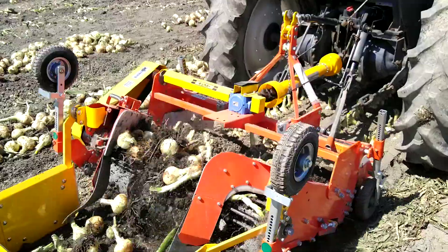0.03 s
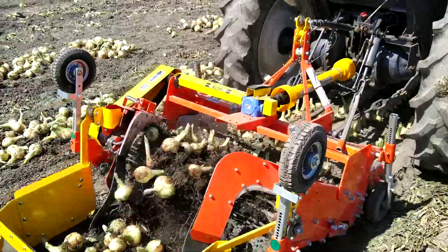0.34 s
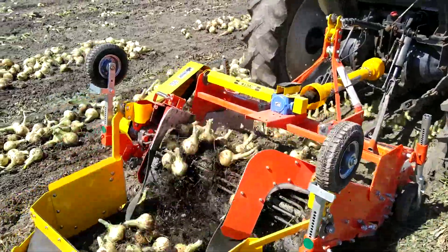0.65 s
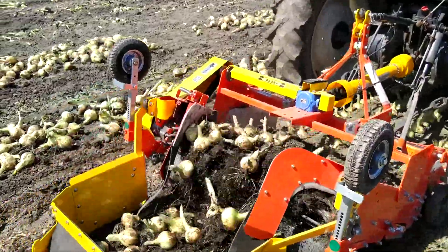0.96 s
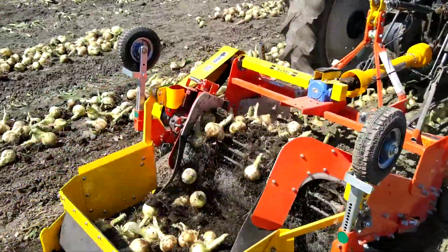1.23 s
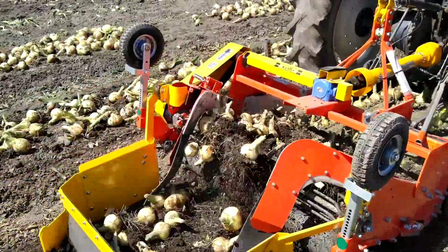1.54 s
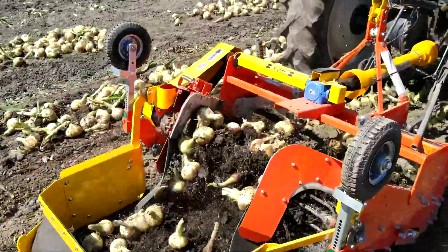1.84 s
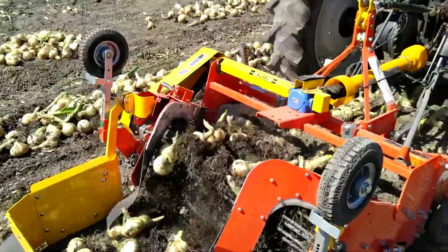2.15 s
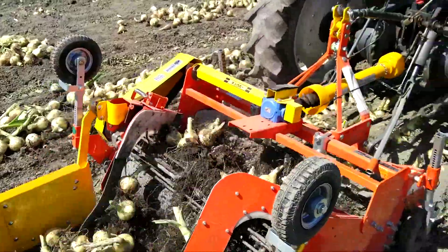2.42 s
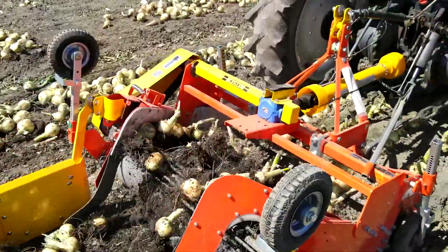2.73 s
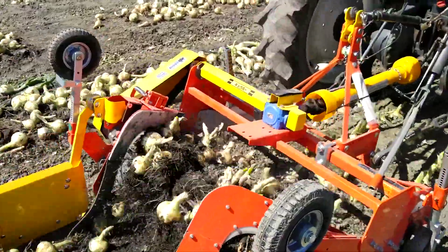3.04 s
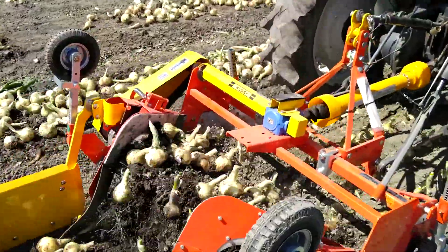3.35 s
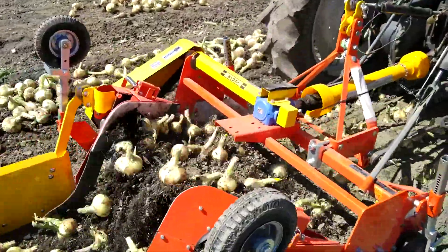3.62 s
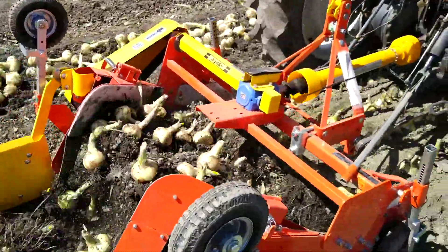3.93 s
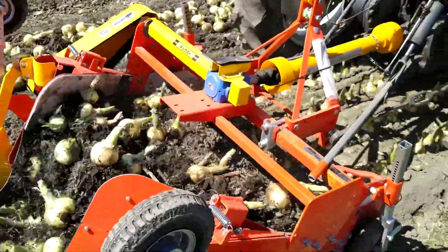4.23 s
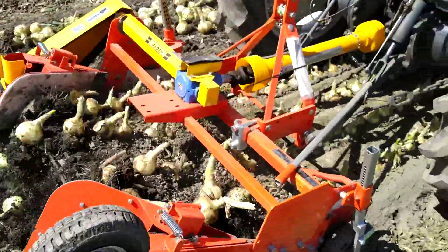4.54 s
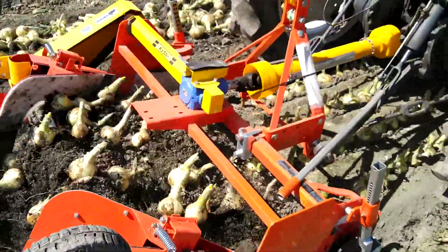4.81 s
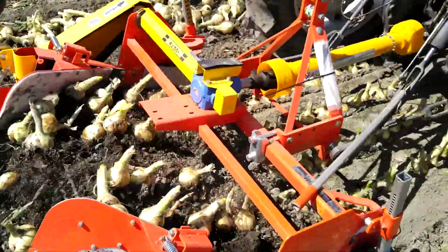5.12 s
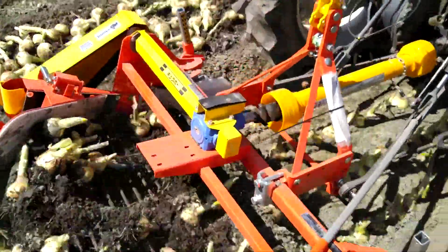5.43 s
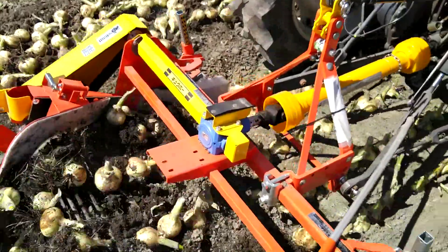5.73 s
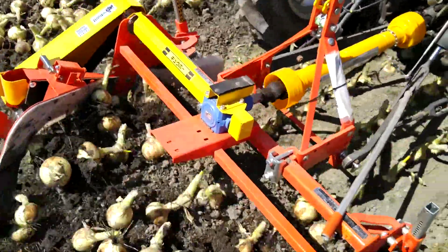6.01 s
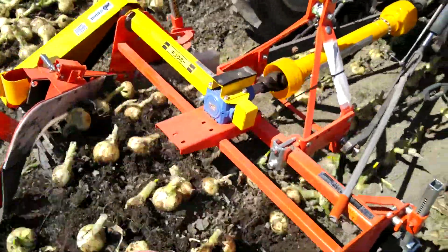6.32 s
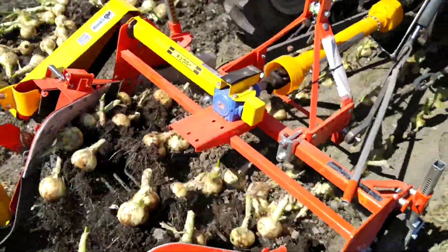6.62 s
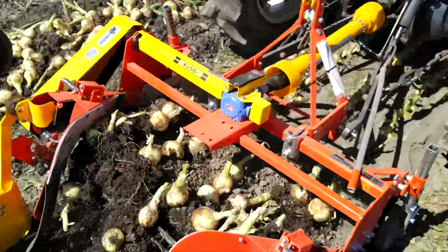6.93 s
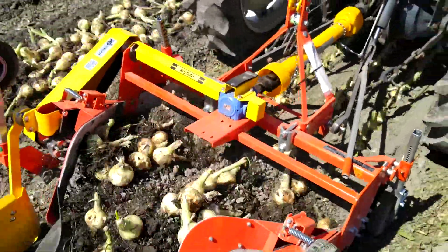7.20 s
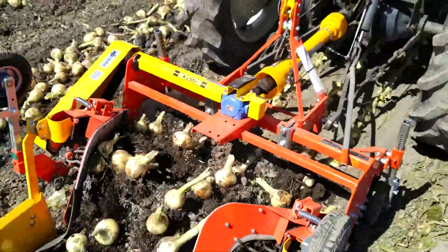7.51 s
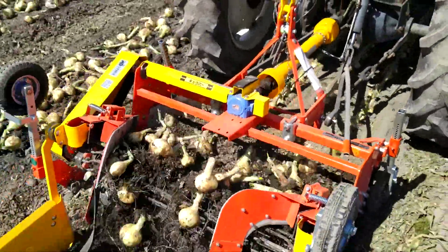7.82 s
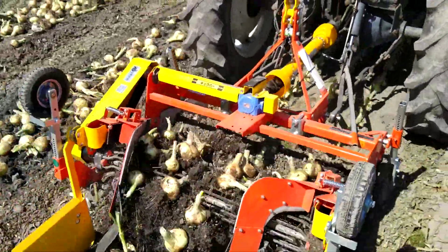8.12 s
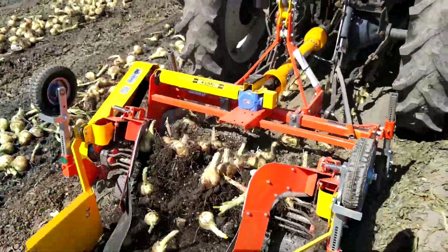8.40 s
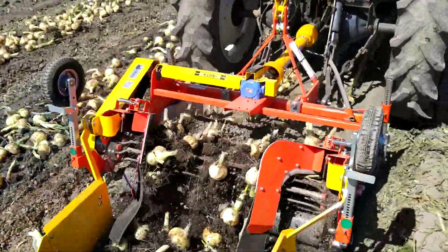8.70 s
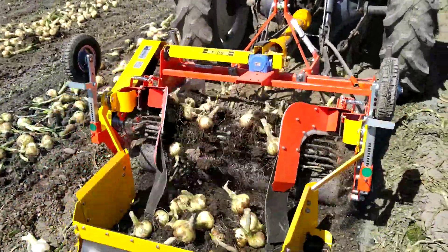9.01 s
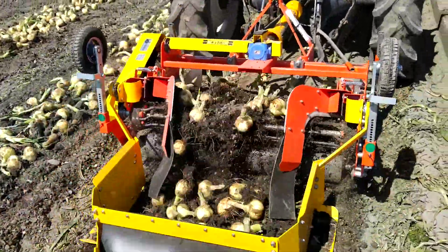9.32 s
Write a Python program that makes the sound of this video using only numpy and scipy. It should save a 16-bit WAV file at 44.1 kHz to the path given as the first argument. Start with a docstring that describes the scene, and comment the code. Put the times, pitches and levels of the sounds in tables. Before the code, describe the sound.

A tractor's diesel engine drones steadily in an open field, with a faint gear whine. Close to the microphone, the steel rod sieve of an onion digger rattles and rings without pause, while earth rumbles over it and sifts through with a crisp hiss. Clods knock irregularly, small stones clink and a dry bearing gives tiny high chirps. The machine grows slightly louder midway, then eases back. A few low wind gusts brush the microphone.

```python
"""Tractor pulling an onion digger

Beside the digger in a dry field, a three-cylinder diesel drones through its silencer and the drive
gears whine. The jolting rod sieve clatters and rings, and soil sifts through it with a crisp hiss.
Clods knock on the steel, stones clink on the rods, a dry bearing chirps. Wind brushes the microphone."""
import sys
import numpy as np
from scipy import signal
from scipy.fft import rfft, irfft
from scipy.io import wavfile
from scipy.ndimage import uniform_filter1d

SR = 44100
rng = np.random.default_rng(int(sys.argv[2]) if len(sys.argv) > 2 else 0)


def generate_wav(sig):
    """Save sig (samples, or channels by samples) to the path in sys.argv[1] as 16-bit PCM at SR."""
    pcm = np.round(np.clip(np.atleast_2d(sig).T, -1, 1) * 32767).astype(np.int16)
    wavfile.write(sys.argv[1], SR, pcm)


N = 417186

# bright spectrum of grit on steel: f/Hz, level/dB
GRIT_SPECTRUM = [(2000, -20), (3400, -7), (4200, -0.5), (5000, 1), (5700, -4), (6350, -9), (7200, -5),
                 (8300, -6), (10000, -1), (13000, -6.5)]


def from_db(db):
    """Decibels to gain."""
    return 10 ** (np.asarray(db) / 20)


def rms_one(x):
    """Scaled to rms 1."""
    return x / np.sqrt(np.mean(x ** 2) + 1e-20)


def in_time(rows):
    """Each column of an automation table at every sample."""
    s, *columns = np.transpose(rows)
    return [np.interp(np.arange(N) / SR, s, c) for c in columns]


def drift(rate):
    """Smooth random modulation of spread 1, moving about `rate` times a second."""
    r = np.exp(-80 * np.pi * rate / SR)
    slow = signal.lfilter([1], [1, -2 * r, r * r], rng.standard_normal(N // 40 + 2002))[2000:]
    return np.interp(np.arange(N) / 40, np.arange(len(slow)), rms_one(slow))


def colour(x, spectrum):
    """Equalises x with an (f/Hz, level/dB) curve, rolling off beyond its ends; rms 1."""
    hz, db = np.transpose(spectrum)
    bins = np.maximum(np.arange(N // 2 + 1) * SR / N, 1)
    gain = from_db(np.interp(np.log(bins), np.log(hz), db))
    skirts = np.minimum(1, np.minimum(bins / hz[0], hz[-1] / bins)) ** 4
    return rms_one(irfft(rfft(x) * gain * skirts, N))


def resonate(x, hz, width_hz):
    """One resonance; rms 1."""
    r = np.exp(-np.pi * width_hz / SR)
    return rms_one(signal.lfilter([1, 0, -1], [1, -2 * r * np.cos(2 * np.pi * hz / SR), r * r], x))


def contacts(per_s, spread_db, decay_s):
    """Power of random contacts of uneven size, each dying away; mean 1."""
    sizes = from_db(spread_db * np.minimum(rng.exponential(1, N), 4)) ** 2
    hits = sizes * (rng.random(N) < per_s / SR)
    power = signal.lfilter([1], [1, -np.exp(-1 / (decay_s * SR))], hits + 1e-18)
    return power / power.mean()


def grains(power):
    """Noise that follows a power envelope."""
    return np.sqrt(power) * rng.standard_normal(N)


def sheet(power, hz, width_hz):
    """Steel rings in a close cluster of modes: a noise band with steep sides."""
    return resonate(resonate(grains(power), hz, width_hz), hz, 3 * width_hz)


def blend(a, b, share):
    """A mix of a and b, with the given share of b."""
    return (1 - share) * a + share * b


def partial(turns, waver_db, waver_rate):
    """A sine whose rms wavers around 1."""
    return np.sqrt(2) * np.sin(2 * np.pi * turns) * from_db(waver_db * drift(waver_rate))


def swells(rows):
    """Smooth rises and falls, one per row, summed for each dB column."""
    t = np.arange(N) / SR
    return sum(np.outer(db, np.cos(np.pi * np.clip((t - s) / length_s, -.5, .5)) ** 2)
               for s, length_s, *db in rows)


def burst(time_s, level_db, decay_s, rise_s):
    """Envelope of blows that swell quickly and die away."""
    out, age = np.zeros(N), np.arange(SR // 8) / SR
    for s, db, decay in np.broadcast(time_s, level_db, decay_s):
        shape = (1 - np.exp(-age / rise_s)) * np.exp(-age / decay)
        start = int(s * SR)
        out[start:start + len(age)] += (from_db(db) * shape / shape.max())[:N - start]
    return out


def nearness(close_db, follows):
    """Gain of a machine part as the microphone comes closer, then falls behind."""
    approach = [(.4, -2.5), (1.7, -2.5), (2.5, -1.5), (4, -1.5), (5.5, 0.4), (6.7, -0.4), (7.9, -1.4),
                (8.6, -4), (9.45, -4.5)]  # closeness to the digger: t/s, gain/dB
    return from_db(close_db + follows * in_time(approach)[0])


def throb(rate_hz=7.87, depth=0.23, peak_s=.563, end_s=2.0):
    """Gain of the lowest exhaust partials: they pulse evenly at first, then settle."""
    t = np.arange(N) / SR
    return 1 + depth * np.clip((end_s - t) * 20, 0, 1) * np.cos(2 * np.pi * rate_hz * (t - peak_s))


def exhaust(cycles, dispersion=.264):
    """Three firings a cycle, each with a puff of gas; unequal cylinders add the partials between."""
    orders = [(1, -12), (2, -24), (3, 3), (4, -22.5), (5, -17.5), (6, -10.5), (7, -12.5), (9, -13.5),
              (11, -25), (12, -15.5), (15, -26.5), (22, -33), (25, -32.5), (26, -34), (34, -29),
              (43, -29.5), (46, -31.5), (47, -37), (54, -26)]  # exhaust partials: multiple of the four-stroke cycle, level/dB
    roar_spectrum = [(40, -14), (90, -5), (130, -2.5), (190, -2), (240, -7.5), (330, -13), (600, -48)]  # gas noise: f/Hz, level/dB
    drone = [(.4, -22, 0.3), (4, -20.5, -1), (6.6, -19, -1.5), (9.4, -21.3, -3.5)]  # exhaust as the microphone moves round: t/s, level/dB, upper-partial shade/dB
    loudness, shade = from_db(in_time(drone))
    # the silencer delays high partials more than low ones, smearing each pulse into a drone
    tones = [(k, from_db(db) * (shade if k > 3 else throb()), k * cycles - dispersion * k * k)
             for k, db in orders]
    firing = sum(gain * partial(turns, waver_db=0.62, waver_rate=2.6)
                 for k, gain, turns in tones if k <= 12)
    growl = sum(gain * partial(turns, waver_db=3.0, waver_rate=1.7)
                for k, gain, turns in tones if k > 12)
    puffs = blend(0.73, 1 + np.cos(6 * np.pi * cycles), share=0.74)
    roar = shade * colour(grains(puffs), roar_spectrum)
    return loudness * (firing + from_db(-3.5) * growl + from_db(-16.5) * roar)


def gears(cycles, teeth_per_cycle=17.03, shaft_hz=2.6, peak_s=0.536, swing_db=3):
    """Meshing teeth whine; each turn of the sieve shaft loads them and swells the sixth harmonic."""
    whine = [(7, -57), (8, -55.5)]  # upper harmonics: multiple of the tooth rate, level/dB
    beam = [(0, -58, -46), (4.8, -60, -55), (5.4, -45, -48), (5.8, -46.5, -50), (7.1, -43, -46.5),
            (8.4, -47.5, -49.5), (9.3, -53, -46.5)]  # harmonics beamed by the housing: t/s, third/dB, sixth/dB
    teeth = teeth_per_cycle * cycles + 0.012 * drift(14.3)  # a little backlash
    third_db, sixth_db = in_time(beam)
    load_db = swing_db * np.cos(2 * np.pi * shaft_hz * (np.arange(N) / SR - peak_s))
    harmonics = whine + [(3, third_db), (6, sixth_db + load_db)]
    return sum(from_db(db) * partial(k * teeth, waver_db=3.0, waver_rate=10.4) for k, db in harmonics)


def rumble(rods):
    """Earth tumbles over the sieve with a dull rumble."""
    tumbling = [(.4, -41), (2, -40.5), (5.4, -36.5), (6.9, -38.5), (9.4, -40.5)]  # tumbling earth: t/s, level/dB
    spectrum = [(200, 0), (330, -5), (430, 1.5), (560, -0.5), (700, -3), (850, -1), (1100, -14.5),
                (1600, -33)]  # its dull body: f/Hz, level/dB
    return from_db(in_time(tumbling)[0]) * colour(grains(blend(1, rods, share=0.4)), spectrum)


def sieve(rods):
    """The rods clatter and set the frame ringing."""
    spectrum = [(600, -14), (950, -1.5), (1300, 1.5), (1750, 0), (2100, -1), (2600, -5.5), (3300, -9.5),
                (4500, -21), (6000, -28)]  # rod clatter: f/Hz, level/dB
    frame_modes = [(504, 52, -13.5), (968, 63, -13.5), (1247, 44, -13.5), (1623, 70, -9.5), (1890, 63, -16)]  # frame resonances: f/Hz, width/Hz, level/dB
    clatter = colour(grains(blend(0.87, rods, share=0.73)), spectrum)
    frame = sum(from_db(db) * sheet(rods, hz, width) for hz, width, db in frame_modes)
    return nearness(-36, follows=0.64) * clatter + nearness(-34.5, follows=1) * frame


def side_plate(rods):
    """The steel side plate rings with the rods and with a sparser rattle of its own."""
    ringing = [(.4, -43.5), (2, -42), (2.2, -36.5), (3.25, -40), (3.45, -48), (3.9, -38), (5.3, -48.5),
               (7.9, -38.5), (9.4, -46.5)]  # plate ring: t/s, level/dB
    modes = [(1132, 38, -3), (1187, 32, -3.5)]  # plate resonances: f/Hz, width/Hz, level/dB
    rattle = blend(rods, contacts(per_s=60, spread_db=1.5, decay_s=0.0036), share=0.57)
    ring = sum(from_db(db) * sheet(rattle, hz, width) for hz, width, db in modes)
    return from_db(in_time(ringing)[0]) * ring


def chute(rods):
    """The shaken chute gives a hollow ring, lost as the microphone moves behind it."""
    ringing = [(.4, -45), (5.3, -41.5), (8.4, -65)]  # chute ring: t/s, level/dB
    return from_db(in_time(ringing)[0]) * sheet(np.sqrt(rods), hz=612, width_hz=55)


def gravel(pebbles):
    """Grit sizzles and small stones tick dryly on twelve rods, each with its own colour."""
    grit = colour(grains(pebbles), GRIT_SPECTRUM)
    ticks = sum(sheet(contacts(per_s=9, spread_db=3.0, decay_s=0.0044), hz, width_hz=650)
                for hz in np.geomspace(4000, 5300, 12))
    return nearness(-39, follows=1.13) * (grit + from_db(-5.5) * rms_one(ticks))


def soil(earth, heap_db):
    """Dry crumbs and finer dust hiss as they sift through the rods."""
    flow = [(.4, 1), (.95, -2), (1.35, -4.5), (1.6, 0.6), (3.6, 0.1), (4.3, 0), (5.5, 2.3), (6.7, -1.5),
            (9.45, -3.5)]  # soil flow beneath the heaps: t/s, gain/dB
    crumb_spectrum = [(6500, -36), (8000, -19), (9500, -13.5), (10800, -5.5), (11800, 0), (12400, 3),
                      (13000, 0), (14000, -15)]  # crisp hiss: f/Hz, level/dB
    dust_spectrum = [(9000, -26), (11500, -17), (12600, -2), (13200, -7), (14000, 8), (15000, -2.5),
                     (16000, -10)]  # airy top: f/Hz, level/dB
    flow_db, = in_time(flow)
    crumbs = from_db(-33.5 + flow_db + heap_db) * colour(grains(earth), crumb_spectrum)
    dust = from_db(-41 + 0.52 * flow_db + 1.1 * heap_db) * colour(grains(earth), dust_spectrum)
    return crumbs + dust


def digger():
    """The sieve's jolts shake rods, pebbles and earth together; each adds finer contacts of its own."""
    heaps = [(1.19, 0.27, 3.5, 0), (3.28, 0.31, 2.5, 3), (3.95, 0.35, 2, 1), (4.47, 1, 1.5, 3),
             (5.65, 0.31, -1.5, 1.5), (7.56, 0.54, 6, -0.6), (8.78, 0.17, 4, 1.5)]  # heaps crossing the sieve: centre/s, length/s, soil gain/dB, stone gain/dB
    soil_db, stones_db = swells(heaps)
    jolts = contacts(per_s=130, spread_db=2.5, decay_s=0.02)
    rods = blend(jolts, contacts(per_s=400, spread_db=3.5, decay_s=0.0022), share=0.46)
    pebbles = blend(jolts, contacts(per_s=1200, spread_db=-1.0, decay_s=0.00095), share=0.12)
    earth = blend(jolts, contacts(per_s=730, spread_db=3.0, decay_s=0.0021), share=0.49)
    body = rumble(rods) + from_db(stones_db) * sieve(rods) + side_plate(rods) + chute(rods)
    return body + from_db(1.05 * stones_db) * gravel(pebbles) + soil(earth, soil_db)


def rod_ring(strikes, count=5, spacing=.09, decay_s=0.0069):
    """Each strike (t/s, level/dB, f/Hz) starts a cluster of quickly dying rod modes."""
    out, age = np.zeros(N), np.arange(SR // 8) / SR
    for s, db, hz in strikes:
        modes = hz * (1 + spacing * (np.linspace(-2, 2, count) + rng.uniform(-0.52, 0.475, count)))
        strengths = np.hanning(count + 2)[1:-1] * rng.choice([-1, 1], count)
        ring = strengths @ np.sin(2 * np.pi * np.outer(modes, age)) / np.linalg.norm(strengths)
        out[int(s * SR):][:len(age)] += from_db(db) * ring * np.exp(-age / decay_s)
    return out


def clods(rod_hz=4600):
    """A clod cracks against the steel, knocks, sets a rod ringing and crumbles with a bright crunch."""
    hits = [(0.213, -21.5, -21, 0.0082), (0.8073, -29.5, -43, 0.0047), (1.2504, -27.5, -35, 0.005),
            (1.892, -28, -31, 0.01), (2.071, -39, -24, .002), (2.161, -26.5, -30, 0.012),
            (2.2467, -27, -25, .007), (2.7001, -29.5, -34, 0.0065), (2.7697, -27.5, -30, 0.0081),
            (2.8529, -29, -25, 0.0055), (3.313, -29, -22, 0.006), (3.5737, -25.5, -13.5, 0.0071),
            (3.961, -25, -23, .004), (4.405, -26, -37, 0.0052), (4.7657, -31, -34, .005),
            (4.882, -29.5, -31, 0.0038), (5.2894, -25, -24, 0.013), (5.4984, -29, -26, 0.0068),
            (5.622, -23, -34, 0.011), (5.761, -26.5, -40, .006), (5.9364, -24.5, -25, .007),
            (6.2075, -23, -28, 0.009), (6.4163, -30, -32, 0.0037), (6.805, -28, -43, 0.004),
            (7.24, -25.5, -36, 0.0046), (7.77, -30, -24, 0.004), (7.863, -27, -34, 0.0098),
            (7.911, -25.5, -32, 0.0042), (8.0456, -34, -30, .005), (8.3924, -55, -27, .002),
            (8.4514, -27, -28, .005), (8.7469, -32, -27, .006)]  # clod hits, relative levels: t/s, knock/dB, crunch/dB, crunch decay/s
    knock_spectrum = [(300, -13), (500, 4.5), (1200, 5.5), (2000, 7.5), (3000, 0.5), (4600, 0.5), (5500, 0),
                      (6400, -7), (8000, 1), (10000, -6), (14000, -58)]  # body of the hit: f/Hz, level/dB
    crunch_spectrum = [(7000, -23), (9500, -12.5), (11000, -5), (12200, 3.5), (13500, -2), (15000, -19),
                       (16000, -23)]  # crumbling earth: f/Hz, level/dB
    time_s, knock_db, crunch_db, decay_s = np.transpose(hits)
    crack = burst(time_s, knock_db - 2, decay_s=0.0013, rise_s=0.0002)
    knock = burst(time_s, knock_db - 2.5, 2.14 * decay_s, rise_s=0.00047)
    crunch = burst(time_s, crunch_db + 4, decay_s, rise_s=0.00056)
    layers = [(crack, GRIT_SPECTRUM), (knock, knock_spectrum), (crunch, crunch_spectrum)]
    impacts = sum(envelope * colour(rng.standard_normal(N), spectrum) for envelope, spectrum in layers)
    return impacts + rod_ring([(s, db - 2, rod_hz) for s, db in zip(time_s, knock_db)])


def bearing(hz=8708, second_hz=8460, wobble_hz=22, rise_s=0.011, stop_s=0.015, ring_s=0.023, ring_db=-19):
    """Each dry rub swells into a thin, unsteady whistle of two close modes that rings on."""
    chirps = [(0.59, 0.027, -30), (0.661, .015, -24), (1.135, 0.024, -18), (1.264, 0.018, -32),
              (1.536, .035, -30), (1.722, 0.022, -27), (1.803, 0.028, -19), (2.19, 0.028, -27),
              (2.292, .012, -28), (2.415, 0.024, -33.5), (2.692, 0.053, -30.5), (2.806, 0.026, -25),
              (2.86, 0.044, -30), (2.959, 0.044, -25), (3.231, 0.022, -34), (3.33, 0.055, -31.5),
              (3.604, 0.019, -27.5), (4.01, 0.025, -26), (4.1, 0.033, -28), (4.175, 0.023, -29),
              (4.376, 0.0092, -18), (4.635, 0.048, -31.5), (4.721, 0.02, -24), (4.994, 0.02, -25),
              (5.465, .03, -26), (5.659, 0.017, -33), (5.93, 0.041, -19.5), (6.06, 0.02, -21),
              (6.206, 0.016, -31), (6.314, 0.041, -31.5), (7.324, 0.032, -25), (7.39, 0.016, -29.5)]  # hard rubs: t/s, length/s, relative level/dB
    singing = [(.4, -55), (1, -43), (2, -62), (5, -47), (8, -54), (8.4, -64)]  # faint singing of lighter rubs in between: t/s, relative level/dB
    envelope = from_db(in_time(singing)[0] - 2 + 5 * drift(9))
    age = np.arange(SR // 4) / SR
    for s, length_s, db in chirps:
        released = np.maximum(age - length_s, 0)
        fall = np.maximum(np.exp(-released / stop_s), from_db(ring_db) * np.exp(-released / ring_s))
        envelope[int(s * SR):][:len(age)] += from_db(db - 1.5) * np.minimum(age / rise_s, 1) * fall
    turns = np.cumsum(hz + wobble_hz * drift(140)) / SR
    second = from_db(-26) * partial(turns * second_hz / hz, waver_db=5.5, waver_rate=60)
    return envelope * (partial(turns, waver_db=3.0, waver_rate=120) + second)


def wind(breeze_db=-38, rise_s=0.13):
    """Air buffets the microphone: a light breeze and a few gusts that rise, hold and drop."""
    gusts = [(.6, 1.002, 13.5), (5.2, 6.9, 11.5), (7.7, 8.65, 17)]  # gusts: start/s, end/s, level above the breeze/dB
    spectrum = [(12, 6), (20, 3.5), (36, -2), (70, -11.5), (130, -19.5), (300, -52)]  # low buffeting: f/Hz, level/dB
    t = np.arange(N) / SR
    steps_db = sum(db * ((t > start) & (t < end)) for start, end, db in gusts)
    gust_db = uniform_filter1d(steps_db.astype(float), int(rise_s * SR))
    return from_db(breeze_db + gust_db + 1.5 * drift(2.4)) * colour(rng.standard_normal(N), spectrum)


def stones():
    """Single stones clink on the sieve rods."""
    clinks = [(2.6038, -34, 4970), (3.1795, -28, 4360), (3.6065, -27, 5110), (4.2172, -27, 4550),
              (4.3084, -28, 4300), (4.6447, -30, 4370), (5.5586, -23, 4710), (6.6297, -28, 4580),
              (6.7549, -29, 4220), (6.8522, -28, 4550), (7.1665, -27, 4770), (7.7047, -30, 5020),
              (8.1128, -29, 5130), (8.2245, -28, 5010), (8.9793, -27, 5340)]  # stone strikes: t/s, level/dB, f/Hz
    return rod_ring(clinks)


def scene():
    """Engine speed drives exhaust and gears; the digger works close to the microphone."""
    engine_speed = [(.4, 54.77), (3.4, 54.9), (5.25, 54.9), (5.91, 54.76), (6.7, 55.25), (7.35, 55.1),
                    (9.45, 55.35)]  # diesel firing rate: t/s, f/Hz
    cycles = np.cumsum(in_time(engine_speed)[0]) / (3 * SR)
    return (exhaust(cycles) + gears(cycles) + digger() + clods() + stones() + bearing() + wind())[None]


def record(dry, notch_hz=6300, notch_width_hz=240, ceiling=.8, cutoff_hz=15900):
    """The microphone has a narrow treble dip; the sound fades in, is soft-clipped and loses its top."""
    fade_in = [(0, -88, -18), (.118, -88, -20), (.122, -16, -13), (.2, -8.5, -21), (.3, -2.5, -13),
               (.378, -1.5, -24), (.392, 1, -5)]  # opening fade, bass last: t/s, gain/dB, bass gain/dB
    gain_db, bass_db = in_time(fade_in)
    heard = signal.lfilter(*signal.iirnotch(notch_hz, notch_hz / notch_width_hz, fs=SR), dry)
    bass = signal.sosfiltfilt(signal.butter(2, 130, fs=SR, output="sos"), heard)
    faded = from_db(gain_db) * (heard + (from_db(bass_db) - 1) * bass)
    rounded = faded / (1 + (faded / ceiling) ** 4) ** .25
    return signal.sosfilt(signal.ellip(12, .1, 90, cutoff_hz, fs=SR, output="sos"), rounded)


dry = scene()
out = record(dry)
generate_wav(out)
```